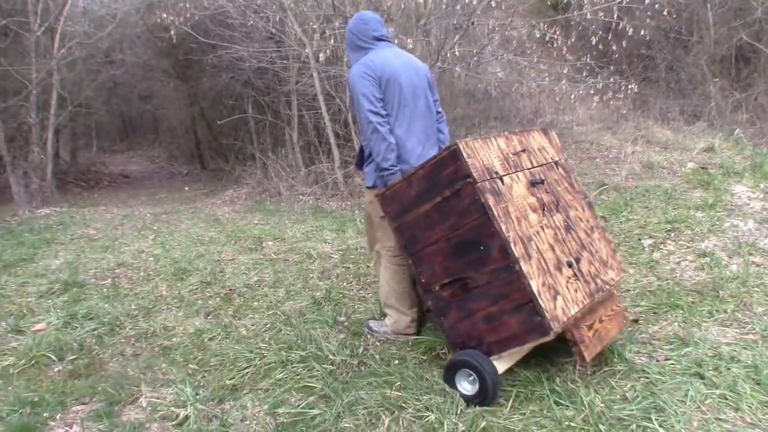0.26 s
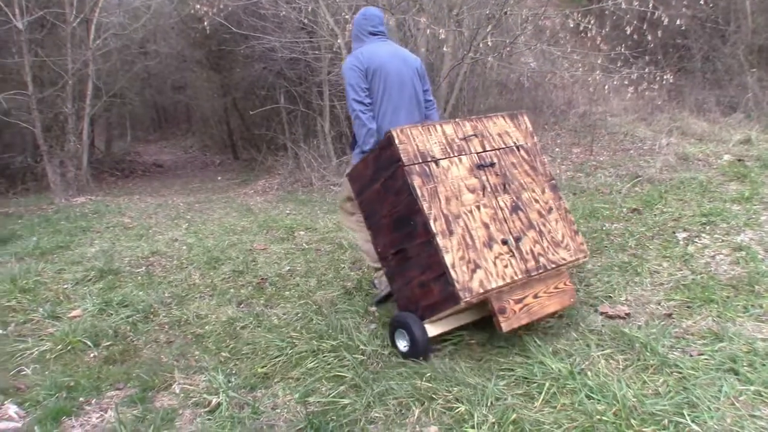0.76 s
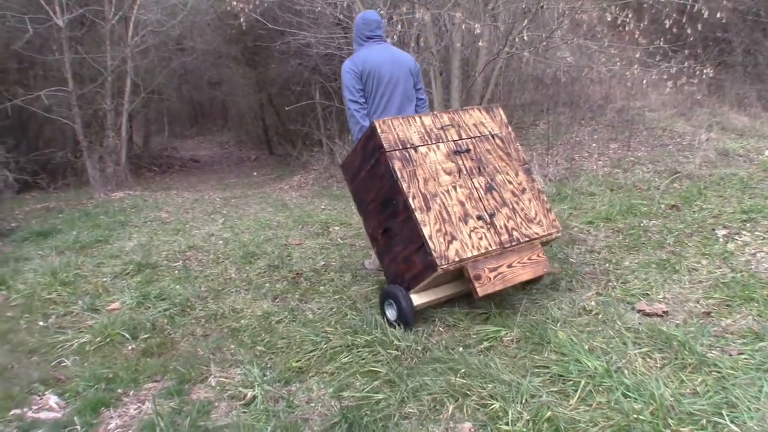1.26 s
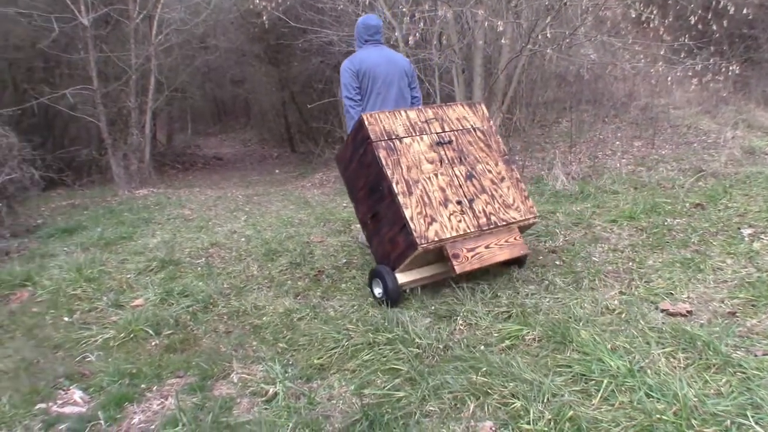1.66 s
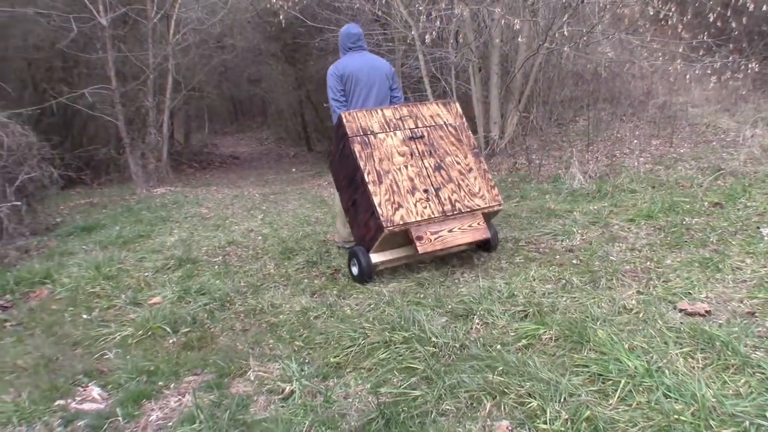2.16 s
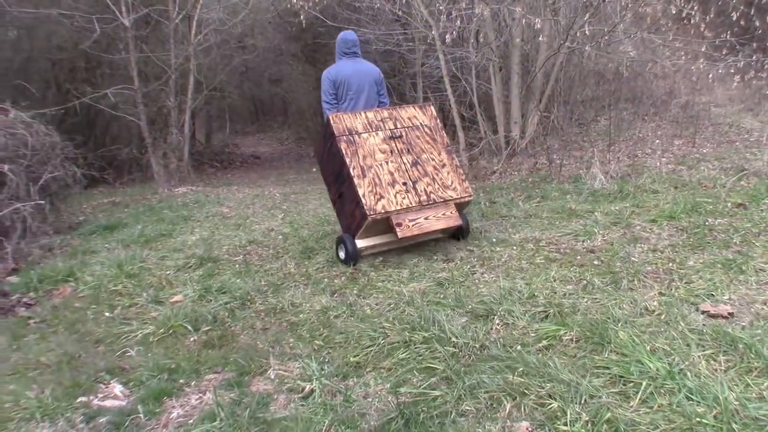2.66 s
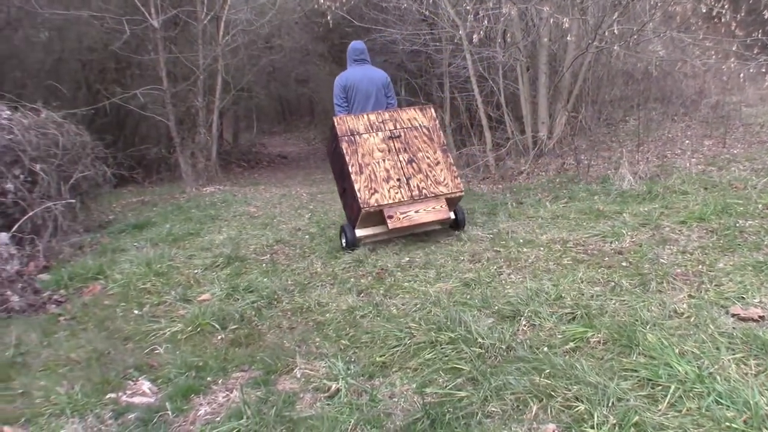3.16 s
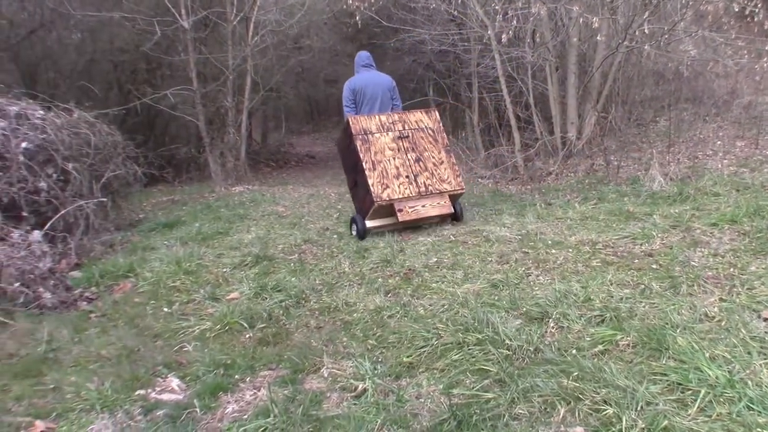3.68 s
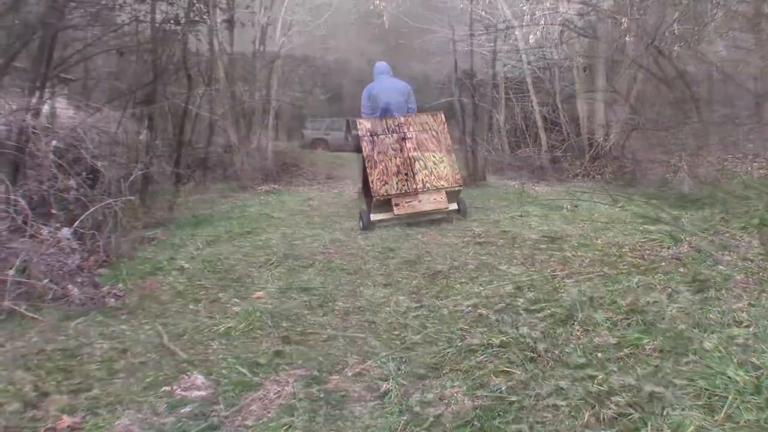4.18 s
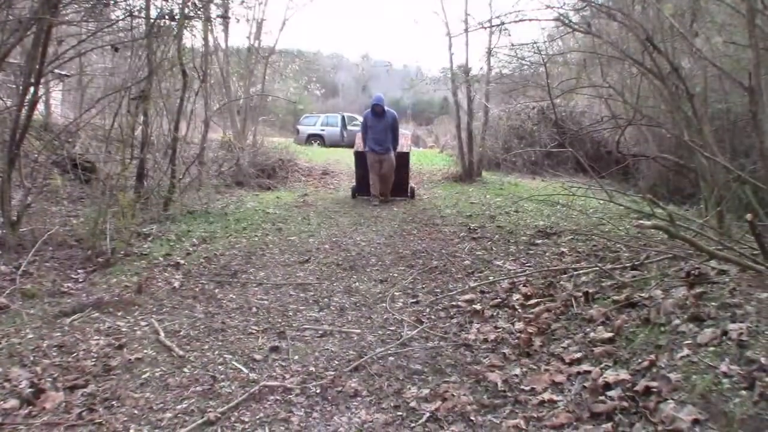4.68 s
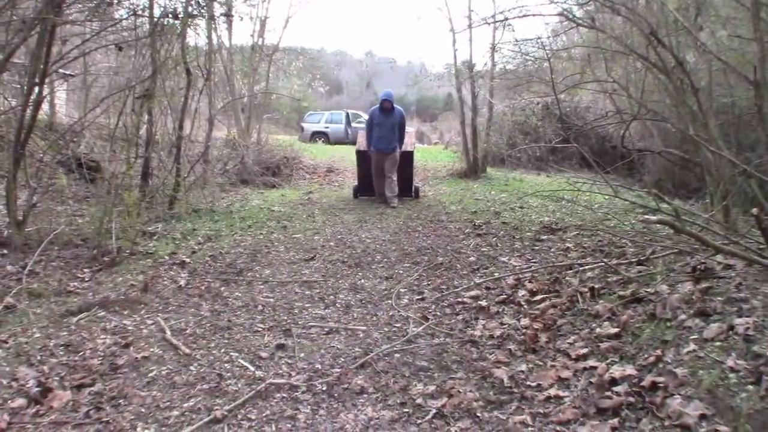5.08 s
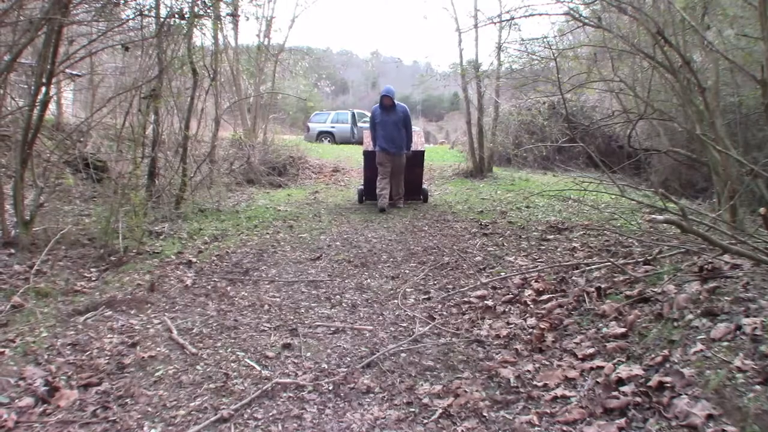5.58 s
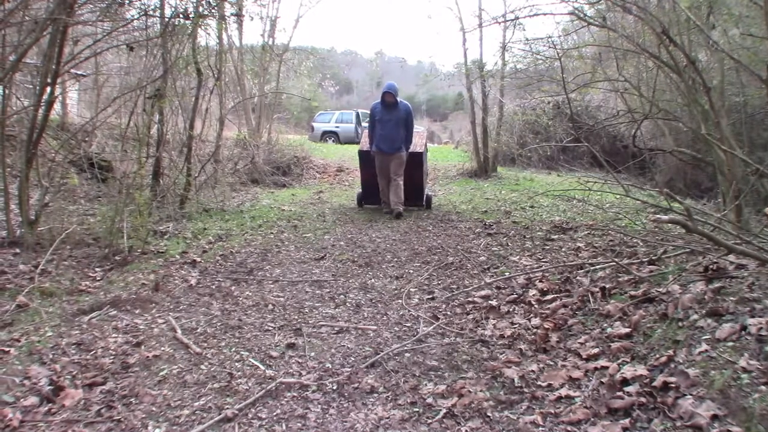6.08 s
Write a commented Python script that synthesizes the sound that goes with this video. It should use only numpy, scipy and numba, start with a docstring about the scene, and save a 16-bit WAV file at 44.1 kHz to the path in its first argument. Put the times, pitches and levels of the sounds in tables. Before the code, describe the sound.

A hollow wooden cart on rubber wheels knocks and rattles over swishing grass, then after a tiny gap rolls more softly over crackling dry leaves.

```python
"""Wooden cart over grass and leaves

A wooden box on two rubber wheels is pulled away over rough grass, then, after a short, nearly silent gap,
towards the listener over dry leaves. Tyres and shoes swish and crackle: flickering noise mixed with clicks.
Loose boards knock and chatter as clicks ring the box's pitches; twigs snap, panels squeak, and one jolt rings
a steel fitting. Soft air noise and hiss lie behind, and narrow dips cut the spectrum."""
import sys
import numpy as np
from scipy import signal
from scipy.fft import rfft, irfft, next_fast_len
from scipy.io import wavfile
from scipy.ndimage import uniform_filter1d
from numba import njit

SR = 44100
rng = np.random.default_rng(int(sys.argv[2]) if len(sys.argv) > 2 else 0)


def bounce(signal):
    """Save signal as a 16-bit WAV file at the path given by the first command-line argument."""
    frames = np.transpose(np.atleast_2d(signal))
    limited = np.clip(frames, -1, 1)
    pcm = np.round(limited * 32767).astype(np.int16)
    wavfile.write(sys.argv[1], SR, pcm)


N = 279153
TIME = np.arange(N) / SR  # seconds
GAP_START_S, GAP_END_S = 4.2995, 4.327  # between grass and leaves

# The box's own ringing pitches. Each row: pitch in Hz, level in dB, time to fade by 60 dB in seconds.
BOX_MODES = [(167, 2.5, 0.07), (231.4, 2, 0.066), (441.4, 7, 0.062), (525, 8.5, 0.033), (738, 7, 0.021),
             (831, 0.5, 0.14), (955, 4, 0.034), (1184, 10.5, 0.036), (1316, 3, 0.053), (1452, 10.5, 0.032),
             (1616, 11, 0.02), (3144, 8, 0.0066)]


def undb(db):
    """Turns decibels into a plain gain."""
    return 10 ** (np.asarray(db) / 20)


def unit(x):
    """Scales x to an average (RMS) level of 1."""
    return x / np.sqrt(np.mean(x ** 2))


def curve(rows):
    """Gain over time from rows of seconds and dB."""
    s, db = np.transpose(rows)
    return undb(np.interp(TIME, s, db))


def shape(x, points):
    """Colours x: each point gives a pitch in Hz and a gain in dB."""
    size = next_fast_len(len(x))
    hz, db = np.transpose(points)
    bins_hz = np.fft.rfftfreq(size, 1 / SR)
    gain = undb(np.interp(np.log(bins_hz + 1), np.log(hz), db))
    return irfft(rfft(x, size) * gain, size)[:len(x)]


def filtered(x, order, hz, kind):
    """Runs x through a smooth low, high or band filter."""
    return signal.sosfilt(signal.butter(order, hz, kind, fs=SR, output="sos"), x)


@njit
def notch(x, hz, width, depth):
    """Takes a share (depth) of a moving band out of x, with a two-store resonant filter."""
    y, band, low = np.empty(len(x)), 0., 0.
    for i in range(len(x)):
        g, k = np.tan(np.pi * hz[i] / SR), width / hz[i]
        v = (band + g * (x[i] - low)) / (1 + g * (g + k))
        band = 2 * v - band
        low = low + 2 * g * v
        y[i] = x[i] - depth[i] * k * v
    return y


def walk(rate):
    """Wandering random levels: each is held for 1 / rate seconds, then the steps are smoothed twice."""
    k = int(SR / rate)
    steps = np.repeat(rng.standard_normal(N // k + 1), k)
    return unit(uniform_filter1d(uniform_filter1d(steps, k), k)[:N])


def clicks(count, rate, scatter_db):
    """Single-sample clicks at random moments, about rate a second, a few much larger than the rest."""
    when, sign, size = rng.random((3, count))
    heights = undb(-scatter_db * np.log(1.015 - size))
    return (when < rate / SR) * np.sign(sign - .5) * heights


def ring(modes, gains, seconds=.25):
    """One tap: a fading sine for each mode (Hz, dB, seconds to fade by 60 dB)."""
    t = np.arange(int(seconds * SR)) / SR
    return sum(g * undb(db - 60 * t / t60) * np.sin(2 * np.pi * hz * t)
               for (hz, db, t60), g in zip(modes, gains))


def add(out, x, s):
    """Mixes x into out from time s on."""
    i = int(s * SR)
    out[i:i + len(x)] += x[:N - i]


def swish():
    """Grass and leaves crushed: bands half an octave apart each have flickering hiss and their own crackles."""
    # Colour of the swish. Each row: pitch in Hz, gain in dB.
    swish_colour = [(150, -38), (600, -1), (1500, -4), (3150, 2.5), (4500, -0.5), (6200, 3.5), (9000, 0),
                    (12000, -7.5), (15500, -25.5)]
    # The ground's echo hollows out the swish at a falling pitch. Each row: time in seconds, pitch in Hz.
    hollow_path = [(0.3, 2700), (2.4, 2220), (4.3, 2120), (4.35, 1950)]
    out, press = 0, walk(30)  # press moves all bands together
    for hz in 200 * 2 ** np.arange(0, 6.6, .5):
        hiss = rng.standard_normal(N) + unit(clicks(N, rate=900, scatter_db=5.0))
        flicker = undb(press + 2.08 * walk(40))
        out = out + flicker * filtered(hiss, 1, [hz / 1.2, min(hz * 1.2, 20000)], "band")
    hollow_hz = np.interp(TIME, *np.transpose(hollow_path))
    out = notch(unit(shape(out, swish_colour)), hollow_hz, 1320.0, np.full(N, 0.78))  # width in Hz, depth
    treble_start_hz = 4340
    body = signal.sosfiltfilt(signal.butter(2, treble_start_hz, fs=SR, output="sos"), out)
    return treading(False) * body + treading(True) * (out - body)


def treading(treble):
    """Loudness of the swish: the tyres roll on, each crunch swells and fades as weight comes on and off."""
    # Tyres rolling, the swish between crunches. Each row: time in seconds, level in dB.
    tyre_levels = [(0, -46.5), (.45, -47.5), (1.2, -49), (1.8, -51.5), (2.4, -50.5), (2.95, -50),
                   (3.3, -45), (3.6, -49), (3.95, -50.5), (4.34, -52.5), (5.3, -53), (5.95, -56.5),
                   (6.33, -55)]
    # A shoe or wheel crushing a patch of grass or leaves. Each row: middle in seconds, peak level in dB,
    # length in seconds, extra treble in dB.
    crunches = [(0.717, -47, 0.085, 6.2), (0.86, -43.5, 0.045, -3), (1.142, -50.5, 0.058, 5),
                (1.392, -45.5, 0.16, 1.7), (1.53, -46.5, 0.097, -3), (1.955, -48, 0.22, -1),
                (2.269, -45, 0.075, 3), (2.56, -48, 0.1, 2.5), (2.692, -39, 0.1, -4),
                (2.904, -45, 0.063, 1), (3.128, -42.5, 0.17, 1.2), (3.437, -40.5, 0.095, -2),
                (3.579, -42, 0.042, -4), (3.653, -41, 0.11, -4.5), (3.813, -40.5, 0.12, -2),
                (4.137, -50, 0.36, 2.3), (4.393, -45, 0.16, -15), (4.707, -50.5, 0.13, 3.5),
                (4.89, -53, 0.072, 4.8), (5.035, -47, 0.2, -4), (5.559, -41.5, 0.095, -3),
                (5.704, -44.5, 0.035, -11), (5.835, -49, 0.11, -2), (6.032, -46.5, 0.045, -7),
                (6.198, -41.5, 0.13, -5), (6.299, -44, 0.034, -6.5)]
    edge = 2.33  # how abruptly a crunch starts and stops
    leaf_treble_db = -1  # tyres roll duller on leaves
    t = TIME[::64]  # a coarse clock is enough for slow swells
    swell_power = 0
    for s, db, length_s, treble_db in crunches:
        swell = np.exp(-np.abs(2 * (t - s) / length_s) ** edge)
        swell_power = swell_power + (undb(db + treble * treble_db) * swell) ** 2
    tyres = curve(tyre_levels) * undb(treble * leaf_treble_db * (TIME > GAP_START_S))
    return np.sqrt(tyres ** 2 + np.interp(TIME, t, swell_power))


def knocks():
    """Each bump is a blow and a dying chatter of rebounds; every blow meets the modes differently."""
    # Boards knocking. Each row: start in seconds, level in dB, extra bass from the panels in dB,
    # fading time of the chatter in seconds.
    bumps = [(0.27, -40, 15.5, 0.013), (0.418, -42.5, -27, 0.0038), (0.445, -38.5, -17, 0.016),
             (0.484, -31.5, -24, 0.022), (0.498, -32.5, 4, 0.019), (0.624, -46, -8, 0.023),
             (0.649, -39, 10, 0.007), (0.671, -39, 4, 0.021), (0.714, -44, 1, .012), (0.734, -39, 9, 0.016),
             (0.751, -38.5, 17, 0.011), (0.802, -43.5, 14, 0.051), (0.859, -41.5, 6, 0.023),
             (0.904, -34.5, -12, 0.023), (1.03, -45.5, 9, 0.035), (1.152, -43.5, 17, 0.016),
             (1.234, -28, -29, 0.019), (1.255, -35.5, -21, 0.011), (1.309, -45, -10, 0.011),
             (1.344, -35.5, -25, 0.035), (1.369, -36.5, -5, 0.024), (1.438, -40, 7, 0.042),
             (1.525, -36.5, -18, 0.024), (1.936, -36, 7, 0.0075), (1.959, -42, 1, 0.019),
             (2.294, -40, 2.5, 0.015), (2.576, -36, -17, 0.013), (2.701, -39, 12, 0.0085),
             (2.774, -37, 11, 0.014), (2.855, -45, 8, 0.0045), (2.916, -39, 3, 0.03),
             (3.09, -36.5, 6.5, 0.016), (3.225, -39, -8, 0.035), (3.298, -46, 18, 0.013),
             (3.562, -48.5, 9, 0.012), (3.655, -39, 15, 0.0068), (3.813, -35.5, -9, 0.016),
             (3.868, -48, 13, 0.009), (3.912, -49, 1, 0.0066), (3.99, -50, -21, 0.012),
             (4.847, -48.5, 3, 0.02), (4.909, -49, -1, 0.021), (5.042, -48.5, -4, 0.027),
             (5.535, -45.5, -6, 0.056), (5.736, -50, 7, 0.028), (5.875, -43.5, -16, 0.024),
             (6.027, -50.5, 6, 0.012), (6.073, -49.5, 12, 0.0051), (6.176, -50, -9, 0.0086)]
    out, hz = np.zeros(N), np.array(BOX_MODES)[:, 0]
    t = np.arange(4096) / SR
    for s, db, bass_db, chatter_s in bumps:
        rebounds = 0.61 * clicks(len(t), rate=900, scatter_db=2.5) * np.exp(-t / chatter_s)
        # rebounds land softer than the first blow, so the tail is duller
        blow = signal.lfilter([.45], [1, -.6], rebounds)
        blow[0] = 1.54
        tilt_db = np.interp(np.log(hz), np.log([240, 700]), [bass_db, 0])
        gains = undb(tilt_db + 2 * rng.standard_normal(len(hz))) * rng.choice([-1, 1], len(hz))
        # each knock rings at slightly different, randomly varied pitches
        detune = 1 + 0.035 * rng.standard_normal(len(hz))
        hit = signal.fftconvolve(blow, box_ring(gains, detune))
        add(out, undb(db) * hit / np.sqrt(np.mean(hit[:1024] ** 2)), s)
    return out


def box_ring(gains, detune=1):
    """One tap on the box: its main modes over a quick wash of many small ones, made of fading noise."""
    hz, db, t60 = np.transpose(BOX_MODES)
    main = ring(zip(hz * detune, db, t60), gains)
    main = filtered(main, 2, 330, "high")  # thins the bass beneath the ringing pitches
    t = np.arange(len(main)) / SR
    wash = filtered(rng.standard_normal(len(t)), 3, [420, 1900], "band") * np.exp(-t / 0.0059)
    crack = filtered(rng.standard_normal(len(t)), 2, [1900, 5500], "band") * np.exp(-t / 0.0038)
    return main / np.max(np.abs(main)) + undb(3.5) * wash + undb(-3.0) * crack


def shaking():
    """Small taps in uneven flurries keep the box sounding while it rolls."""
    # Steady shaking of the box. Each row: time in seconds, level in dB.
    shake_levels = [(0, -50.5), (1.4, -48), (1.65, -52.5), (2.6, -54.5), (3.35, -53.5), (4.29, -61.5),
                    (5.2, -59), (5.6, -55.5), (6.33, -59)]
    taps = undb(3.56 * walk(26)) * clicks(N, rate=800, scatter_db=4.0)
    return curve(shake_levels) * unit(signal.fftconvolve(taps, box_ring(np.ones(len(BOX_MODES))))[:N])


def snaps():
    """A millisecond of splintering, each fibre a few cycles around one pitch."""
    # Sharp cracks of twigs, stalks and board edges. Each row: start in seconds, peak level in dB, pitch in Hz.
    cracks = [(0.463, -30, 5100), (0.488, -19, 1350), (0.507, -38, 3200), (0.914, -17, 1490),
              (1.214, -31, 2600), (1.237, -6, 1410), (1.258, -23, 4970), (1.3478, -14, 1440),
              (2.244, -27, 8300), (2.296, -22.5, 1540), (2.519, -30, 3550), (2.775, -36, 1060),
              (2.832, -33, 3100), (3.236, -25.5, 1290), (3.6557, -26.5, 1550), (3.786, -33, 2800),
              (4.223, -29, 2200), (4.409, -33.5, 2980), (5.565, -36, 3100), (5.69, -39, 3000)]
    out, t = np.zeros(N), np.arange(512) / SR
    for s, db, hz in cracks:
        splinter = np.exp(-t / 0.00084) * clicks(len(t), rate=hz, scatter_db=4.0)
        splinter[0] = 2
        fibre = t * ring([(hz, 0, 4.9 / hz)], [1], len(t) / SR)
        # keeps each snap bright, without a low thump
        snap = filtered(np.convolve(splinter, fibre), 4, hz / 2, "high")
        add(out, undb(db) * snap / np.max(np.abs(snap)), s)
    return out


def steel_fitting():
    """One jolt sets two high, slowly fading pitches ringing in a steel fitting."""
    # Pitches of the fitting. Each row: pitch in Hz, level in dB, time to fade by 60 dB in seconds.
    steel_modes = [(5339, -36, .22), (8522, -42, .22)]
    out = np.zeros(N)
    add(out, ring(steel_modes, [1, 1], .4), 1.243)  # jolt in seconds
    return out


def squeaks():
    """A panel rubs on the frame and sings briefly and unevenly at its own pitch."""
    # Single panels squeaking. Each row: middle in seconds, level in dB, length in seconds, pitch in Hz.
    rubs = [(0.138, -47, 0.041, 824), (3.209, -40.5, 0.018, 838), (3.424, -50.5, 0.1, 434)]
    unevenness = undb(3.9 * walk(150))
    out = np.zeros(N)
    for s, db, length_s, hz in rubs:
        swell = np.exp(-(2 * (TIME - s) / length_s) ** 2)
        out += undb(db) * swell * np.sin(2 * np.pi * hz * TIME)
    return unevenness * out


def open_air():
    """Soft steady noise of the open air, strongest in the low middle."""
    # Colour of the air. Each row: pitch in Hz, gain in dB.
    air_colour = [(100, -5), (200, -6), (730, -1), (1800, -11.5), (15500, -34)]
    return undb(-61) * unit(shape(rng.standard_normal(N), air_colour))


def rolling():
    """The ongoing part: tyres and shoes, shaking box and open air."""
    return swish() + shaking() + open_air()


def scene():
    """Mixes all sources into a shared middle and a side that is added left and subtracted right."""
    # Colour of the side. Each row: pitch in Hz, gain in dB.
    side_colour = [(60, -33), (200, -16.5), (1300, -17), (2400, -4.5), (4400, -14), (8000, -12),
                   (15000, -8)]
    hits = knocks() + steel_fitting() + snaps() + squeaks()
    mid = rolling() + hits
    # wheels and feet are spread out, so left and right differ by an unrelated share of rolling;
    # hits differ by a short scatter
    scatter = rng.standard_normal(2048) * np.exp(-np.arange(2048) / 74.0)
    scattered = signal.fftconvolve(hits, scatter / np.sqrt(np.sum(scatter ** 2)))[:N]
    side = shape(rolling() + undb(-4.0) * scattered, side_colour)
    return np.array([undb(1.7) * mid + side, undb(1.27) * mid - side])


def record(dry):
    """Cuts narrow dips and the bass, adds faint hiss, dips the level in the gap and cuts the top."""
    # Narrow dips in the spectrum. Each row: base pitch in Hz, width in Hz, base depth from 0 to 1.
    dips = [(5190, 640, 0.47), (7205, 780, 0.96), (10320, 1530, 0.82), (12700, 1900, 0.64)]
    # The dips start higher and shallower, while the cart is near and off to the side.
    # Each row: time in seconds, pitch factor, depth factor.
    bearing = [(0, 1.1, .45), (.8, 1.05, .7), (2.6, 1, 1), (4.3, 1, 1), (4.4, .99, .72)]
    # Colour of the faint hiss. Each row: pitch in Hz, gain in dB.
    hiss_colour = [(25, -17.5), (1000, -2), (15500, -19.5)]
    s, pitch, share = np.transpose(bearing)
    pitch, share = np.interp(TIME, s, pitch), np.interp(TIME, s, share)
    out = list(dry)
    for hz, width, depth in dips:
        out = [notch(x, hz * pitch, 1. * width, depth * share) for x in out]
    out = filtered(out, 4, 150, "high")
    out = out + [undb(-59) * unit(shape(rng.standard_normal(N), hiss_colour)) for _ in out]
    # after the gap the sound swells back from half level
    back = 1 - 0.5 * np.exp(-np.abs(TIME - GAP_END_S) / 0.026)
    out = out * np.where(TIME < GAP_START_S, 1, np.where(TIME < GAP_END_S, undb(-30), back))
    return signal.sosfilt(signal.ellip(10, .2, 80, 15750, fs=SR, output="sos"), out)  # steep cut above 15750 Hz


dry = scene()
out = record(dry)
bounce(out)
```